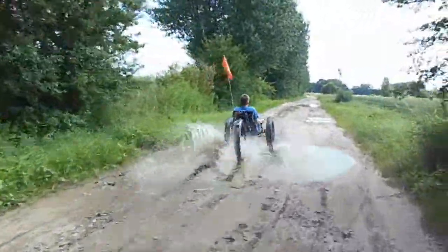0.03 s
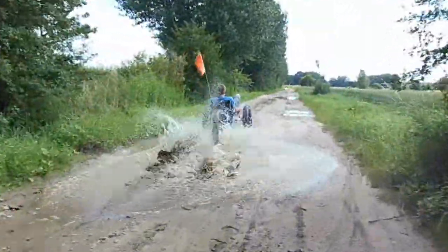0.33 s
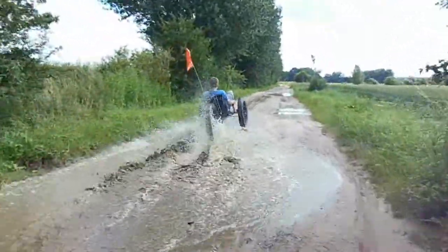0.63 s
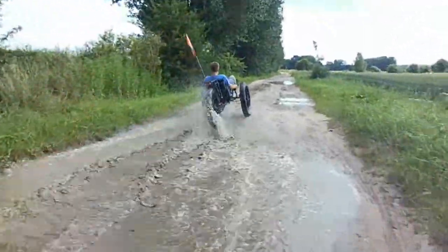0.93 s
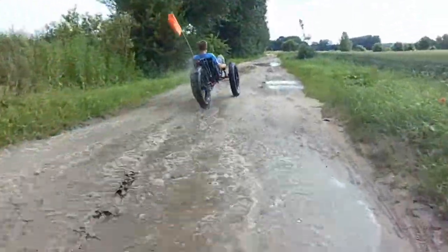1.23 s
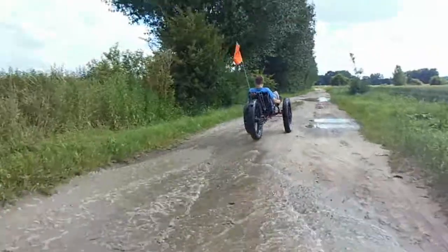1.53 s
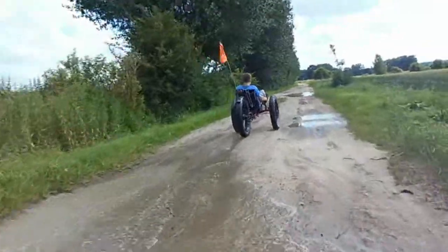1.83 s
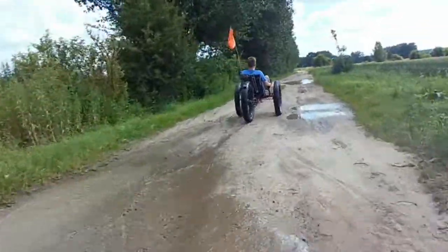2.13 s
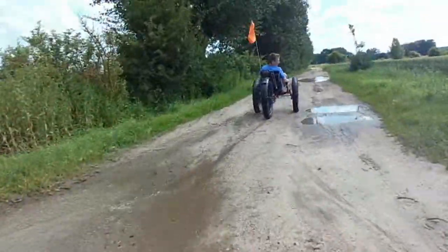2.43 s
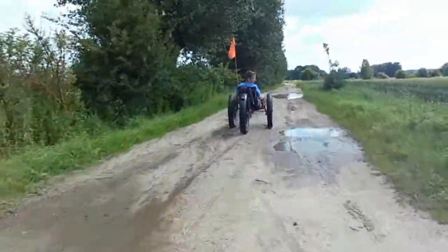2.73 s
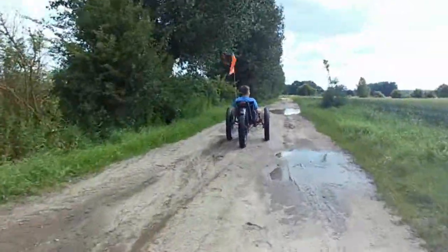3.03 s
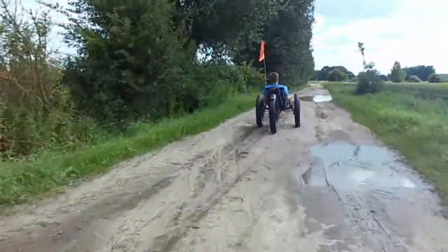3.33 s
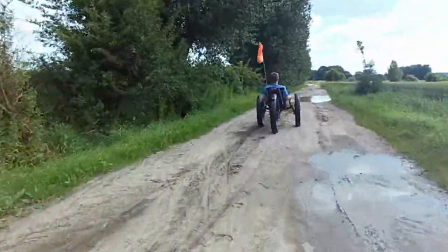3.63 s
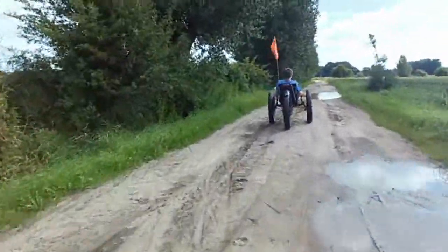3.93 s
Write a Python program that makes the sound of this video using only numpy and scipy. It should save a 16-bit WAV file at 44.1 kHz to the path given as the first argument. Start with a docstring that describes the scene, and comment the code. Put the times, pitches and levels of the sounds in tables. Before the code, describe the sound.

Water sprays from a trike's tyres in a muddy puddle for the first second, a hiss over low drumming and a faint rolling whirr. A sharp knock comes at about 1.1 seconds. From 1.4 seconds closer tyres throw a grainier spray with spatters of drops, running dry near 3 seconds. Wind buffets the microphone throughout, growing harder and overloading into a crackle from 3 to 4 seconds.

```python
"""A trike ploughs through a muddy puddle on a dirt track: its tyres throw a hissing spray over a low
drumming and a rolling whirr, while gusts buffet the microphone of a rider who follows. Just after one
second comes a sharp knock. Then the follower's tyres spray the track close by, flinging handfuls of
drops, and run dry at about three seconds. The gusts, faster and harder towards the end, overload the
microphone into a crackle."""
import sys
import numpy as np
from scipy import signal
from scipy.fft import rfft, irfft, next_fast_len
from scipy.io import wavfile
from scipy.ndimage import uniform_filter1d, map_coordinates

SR = 44100
rng = np.random.default_rng(int(sys.argv[2]) if len(sys.argv) > 2 else 0)


def master_out(mix):
    """Clip the mix to full scale and print it as 16-bit PCM to the path in sys.argv[1]."""
    frames = np.transpose(np.atleast_2d(mix))
    ceiling = np.clip(frames, -1, 1)
    pcm = np.round(ceiling * 32767).astype(np.int16)
    wavfile.write(sys.argv[1], SR, pcm)


N = 176400

# Fader for the water the trike throws: time_s, level_db
TRIKE_SPRAY_LEVEL = [(0.0, -58), (0.238, -57), (0.488, -55), (0.618, -54.5), (0.802, -59), (0.952, -62),
                     (1.108, -64), (1.3, -77)]
# EQ of that spray: frequency_hz, gain_db
TRIKE_SPRAY_EQ = [(200, -7), (750, 0), (1000, -3), (1250, -2.5), (1600, -1), (3300, -0.5), (4300, 1.5),
                  (5600, 0), (9000, 3), (12500, 0.5), (15500, -5.5)]
# Fader for the drumming of wheels in deep water: time_s, level_db
DRUMMING_LEVEL = [(0, -64), (.07, -51), (.17, -59), (.24, -55.5), (.42, -58.5), (.52, -71.5), (.7, -70),
                  (.77, -56.5), (.88, -72), (1.2, -82), (1.5, -86)]
# EQ of the drumming: frequency_hz, gain_db
DRUMMING_EQ = [(60, -35), (130, -10), (185, 1.5), (260, -3.5), (400, -14), (800, -39)]
# EQ of the tyres' dull rush on dirt: frequency_hz, gain_db
RUSH_EQ = [(25, 1), (110, 16), (300, 14), (750, -4), (1600, -7), (3500, 3), (7000, -1.5), (12000, -6),
           (15500, -16)]
# Fader for the tyres' hollow whirr: time_s, level_db
WHIRR_LEVEL = [(0, -69.5), (.6, -73), (.95, -75), (1.25, -77), (1.8, -71.5), (3, -78), (4, -78)]
# EQ of the whirr, one narrow peak: frequency_hz, gain_db
WHIRR_EQ = [(600, -38), (1000, -6), (1250, 5.5), (1500, -18.5), (2200, -25)]
# EQ of the ticking grit: frequency_hz, gain_db
GRIT_EQ = [(2500, -35), (5000, -7.5), (9000, -6), (12500, -10), (15500, -8)]
# Gusts at the microphone: time_s, strength_db
WIND_STRENGTH = [(0.0, -57.5), (0.03, -48.5), (0.08, -43), (0.17, -52), (0.22, -40.5), (0.269, -50.1),
                 (0.319, -42.5), (0.349, -51), (0.369, -46.5), (0.429, -48), (0.529, -65.5), (0.649, -54.5),
                 (0.698, -61.0), (0.768, -41), (0.788, -44), (0.808, -54), (0.928, -69), (0.988, -57),
                 (1.018, -61.5), (1.12, -62), (1.157, -73), (1.35, -67), (1.367, -54.5), (1.417, -54.5),
                 (1.487, -44.5), (1.527, -53.5), (1.586, -58), (1.636, -48.5), (1.696, -54), (1.726, -49.5),
                 (1.816, -62.5), (1.856, -47.5), (1.916, -47.5), (1.966, -50.5), (2.035, -44.5),
                 (2.135, -54.5), (2.155, -46.5), (2.205, -48), (2.235, -61), (2.275, -53.5), (2.395, -52.5),
                 (2.444, -47.5), (2.474, -54.5), (2.524, -52.5), (2.604, -58.5), (2.654, -47.0),
                 (2.744, -52.5), (2.764, -45), (2.794, -45.5), (2.834, -55.5), (2.873, -44), (2.893, -44.5),
                 (2.97, -55), (2.985, -53), (3.0, -70), (3.03, -68), (3.04, -54), (3.065, -64),
                 (3.083, -63), (3.093, -44.5), (3.133, -47.0), (3.263, -48), (3.283, -42.5), (3.322, -42),
                 (3.392, -44.5), (3.472, -40), (3.552, -42.5), (3.622, -49), (3.672, -46), (3.751, -41.5),
                 (3.811, -47), (3.881, -41), (3.931, -46.5), (3.971, -40.5), (3.991, -42)]
# How fast eddies pass at the reference strength: time_s, rate_hz
EDDY_RATE = [(0, 329.2), (.4, 372.1), (.8, 469.2), (1.3, 561.6), (2.0, 702.9), (2.7, 720.8), (3.1, 730.2),
             (3.4, 847.8), (3.75, 880.3), (4, 823.6)]
# EQ of the turbulence, sliding with that rate: multiple_of_eddy_rate, gain_db
EDDY_EQ = [(.03, -3.5), (.15, 0.5), (.45, 0.5), (1, -3), (1.6, -9), (2.6, -22), (5, -39), (12, -82),
           (20, -100)]
# EQ of the wind's rumble: frequency_hz, gain_db
RUMBLE_EQ = [(15, -32), (30, -8), (60, -3.5), (130, -2.5), (220, -16.5), (400, -12), (1500, -37),
             (5000, -100)]
# Single strong eddies, ahead of the overload: time_s, level_db, pitch_hz
EDDY_SLAPS = [(0.074, -41, 203), (0.2048, -43, 604), (0.2188, -37, 228), (0.2405, -35, 760),
              (0.3068, -44, 420.0), (0.3173, -37, 437), (0.762, -42, 694), (0.7749, -44, 408),
              (2.154, -34.5, 1029), (2.622, -43, 1200), (2.7041, -41, 599.3), (2.7908, -43, 755),
              (2.8801, -33.5, 950), (2.8987, -35, 1052), (2.9193, -41, 606), (2.9416, -37.5, 1052),
              (3.096, -37.5, 374), (3.158, -36, 915), (3.2124, -38, 2380), (3.219, -34.0, 1440),
              (3.3107, -30.5, 1370.0), (3.3383, -36, 1230.0), (3.3701, -34, 659), (3.3984, -36, 1070.0),
              (3.4247, -33.5, 1040), (3.4536, -34.0, 1100), (3.4694, -31.0, 1280.0), (3.4869, -32, 1080.0),
              (3.5053, -33.0, 1010), (3.5205, -33.0, 1160), (3.553, -35.5, 830), (3.5745, -32, 1219),
              (3.6048, -33, 1300), (3.6416, -32.5, 1010), (3.6949, -33.5, 870), (3.7143, -44, 940.0),
              (3.7513, -26.5, 1330), (3.7616, -28, 1600), (3.7724, -34.5, 1340), (3.782, -26.5, 1200),
              (3.8311, -31.5, 1000), (3.8794, -32, 527), (3.897, -31, 780.0), (3.9198, -32.0, 1310),
              (3.9754, -31.5, 1480)]
# The knock and its rebound: start_s, level_db
KNOCK_HITS = [(1.1181, -43.5), (1.1202, -49.5)]
# EQ of the knock's noise burst: frequency_hz, gain_db
KNOCK_EQ = [(200, -11), (800, -14), (1350, -8), (2600, -18), (3700, 0.5), (4700, 2), (6200, -5.5),
            (10000, -0.5), (15500, -2)]
# Partials the knock rings with: pitch_hz, relative_level_db, t60_s
KNOCK_PARTIALS = [(1466, -12.5, 0.074), (2260, -8.5, 0.035), (4250, -7, .03), (4570, -12, .03),
                  (4960, 2.5, .03)]
# Fader for the water the follower's tyres throw: time_s, level_db
NEAR_SPRAY_LEVEL = [(1.25, -68.5), (1.38, -60.5), (1.48, -55), (1.68, -53), (1.8, -50.5), (2.05, -50.5),
                    (2.22, -51.5), (2.42, -53), (2.6, -62.5), (2.66, -60.5), (2.74, -65.5), (2.81, -63),
                    (2.97, -73), (3.1, -74)]
# EQ of that close spray: frequency_hz, gain_db
NEAR_SPRAY_EQ = [(200, -56), (800, 3.5), (1250, 1), (1900, 0.5), (3000, 3.5), (4800, 5.5), (6800, 4.5),
                 (9500, 6.5), (12500, 6), (15500, -3.5)]
# Thicker flings of drops: time_s, level_db
SPATTER_CUES = [(1.53, -55), (1.79, -51), (2.065, -50), (2.22, -57), (2.37, -56), (2.665, -61), (2.80, -63)]

RUSH_DB, GRIT_DB = -70, -78.5
WIND_REFERENCE_DB, WIND_TRIM_DB, EDDY_RATE_EXPONENT = -50, -2.63, .44
FLUTTER_DB, FLUTTER_HZ, LULL_DB, LULL_HZ = 5.2, 280, 2, 110
RUMBLE_DB, RUMBLE_DB_PER_WIND_DB = -69, 0.91
KNOCK_T60_S, KNOCK_TAIL_DB, KNOCK_TAIL_T60_S, KNOCK_RING_DB = .028, -17.5, 0.12, -3
OVERLOAD_DB, NOTCH_HZ, NOTCH_WIDTH_HZ, HIGH_CUT_HZ = -36, 10880, 980, 15800


def amp(db):
    """Decibels to gain."""
    return 10 ** (np.asarray(db) / 20)


def unit(x):
    """Normalise to rms 1."""
    return x / np.sqrt(np.mean(x ** 2) + 1e-20)


def curve(rows):
    """An automation line through rows of time_s, value."""
    return np.interp(np.arange(N) / SR, *np.transpose(rows))


def wobble(rate_hz):
    """Smooth random modulation through rate_hz points a second."""
    return map_coordinates(rng.standard_normal(8192), [np.arange(N) * rate_hz / SR], mode="wrap")


def filtered(x, response):
    """Filter x by a gain given as a function of frequency."""
    size = next_fast_len(len(x) + SR // 2)
    return irfft(rfft(x, size) * response(np.fft.rfftfreq(size, 1 / SR)), size)[:len(x)]


def equalised(x, eq, frequency_scale=1):
    """Put x through an EQ curve and normalise it."""
    points, db = np.transpose(eq)
    return unit(filtered(x, lambda hz: amp(np.interp(np.log(hz + 1), np.log(points * frequency_scale), db))))


def noise(eq):
    """A steady bed of coloured noise at rms 1."""
    return equalised(rng.standard_normal(N), eq)


def decay(start_s, t60_s):
    """An envelope with an instant attack and an exponential tail."""
    age = np.arange(N) / SR - start_s
    return (age >= 0) * amp(-60 * np.abs(age) / t60_s)


def pings(spread_db, decay_cycles, count):
    """Tiny damped rings of random pitch and size: drops landing, bubbles bursting or grit ticking."""
    when, pitch, size = rng.random((count, 3)).T
    hz = 1200 * (15000 / 1200) ** (pitch ** .6)
    offsets = np.arange(256)
    cycles = hz[:, None] * offsets / SR
    strength = np.sqrt(hz) * amp(spread_db * np.minimum(-np.log(1 - size), 5))
    rings = strength[:, None] * np.sin(2 * np.pi * cycles) * np.exp(-cycles / decay_cycles)
    positions = (when * N).astype(int)[:, None] + offsets
    return unit(np.bincount(positions.ravel(), rings.ravel(), N)[:N])


def spray(eq, drops_db, spread_db, surge_db):
    """Mist and droplets, surging a little with the tread."""
    mist = rng.standard_normal(N)
    drops = amp(drops_db) * pings(spread_db, decay_cycles=1.8, count=9000)
    spectra = signal.stft(mist + drops, nperseg=256)[2]
    # Random patches of about 1 dB, across pitch and time, roughen the hiss.
    patches = uniform_filter1d(rng.standard_normal(spectra.shape), size=5, axis=0)
    patches_db = unit(uniform_filter1d(patches, size=6, axis=1))
    water = signal.istft(spectra * amp(patches_db), nperseg=256)[1][:N]
    return equalised(water, eq) * amp(surge_db * wobble(rate_hz=90))


def trike_spray(trim_db=2.5):
    """The trike's tyres throw water up ahead: a hiss that swells and dies away."""
    fade_out_db = 60 * np.maximum(np.arange(N) / SR - TRIKE_SPRAY_LEVEL[-1][0], 0)
    fader = amp(curve(TRIKE_SPRAY_LEVEL) - fade_out_db + trim_db)
    return fader * spray(TRIKE_SPRAY_EQ, drops_db=-7.5, spread_db=1, surge_db=.45)


def drumming():
    """A low flutter, probably water drumming against the frame."""
    return amp(curve(DRUMMING_LEVEL)) * noise(DRUMMING_EQ)


def rolling_tyres():
    """Tyres on damp dirt: a dull rush, a hollow whirr and fine ticks of grit."""
    rush = amp(RUSH_DB + 2.4 * wobble(rate_hz=29.25)) * noise(RUSH_EQ)
    whirr = amp(curve(WHIRR_LEVEL)) * noise(WHIRR_EQ)
    grit = amp(GRIT_DB) * equalised(pings(spread_db=2.5, decay_cycles=2.8, count=300), GRIT_EQ)
    return rush + whirr + grit


def wind():
    """Eddies sweep over the microphone: each surge is both louder and faster, over a low rumble."""
    strength_db = curve(WIND_STRENGTH) - WIND_REFERENCE_DB
    flutter_db = FLUTTER_DB * 2 * np.tanh(wobble(FLUTTER_HZ) / 2)
    lull_db = LULL_DB * np.tanh(wobble(LULL_HZ))
    flow = amp(strength_db) * unit(amp(flutter_db + lull_db))
    # Varispeed: stronger flow runs through the turbulence faster, so it brightens.
    eddies_passed = np.cumsum(curve(EDDY_RATE) * flow ** EDDY_RATE_EXPONENT) / SR
    samples_per_eddy = 32
    turbulence = equalised(rng.standard_normal(N), EDDY_EQ, frequency_scale=SR / samples_per_eddy)
    buffet = flow * map_coordinates(turbulence, [eddies_passed * samples_per_eddy], mode="wrap")
    rumble = amp(RUMBLE_DB + RUMBLE_DB_PER_WIND_DB * strength_db) * noise(RUMBLE_EQ)
    return amp(WIND_REFERENCE_DB + WIND_TRIM_DB) * buffet + rumble


def wind_slaps(half_width_cycles=.85):
    """A single strong eddy gives one quick suck of pressure with a push on either side."""
    t, pressure = np.arange(N) / SR, np.zeros(N)
    for time_s, db, hz in EDDY_SLAPS:
        span = np.abs(t - time_s) < 2 / hz
        cycles = (t[span] - time_s) * hz
        envelope = amp(db) * np.exp(-(cycles / half_width_cycles) ** 2)
        pressure[span] -= envelope * np.cos(2 * np.pi * cycles + rng.uniform(-1.3, 1))
    return pressure


def knock():
    """A hard double tick, probably a part of the bike: a short ring and a rattling tail."""
    envelope = np.zeros(N)
    for start_s, db in KNOCK_HITS:
        tail = amp(KNOCK_TAIL_DB) * decay(start_s, KNOCK_TAIL_T60_S)
        envelope += amp(db) * (decay(start_s, KNOCK_T60_S) + tail)
    first_s, first_db = KNOCK_HITS[0]
    age = np.arange(N) / SR - first_s
    ring = sum(amp(first_db + db) * decay(first_s, t60_s) * np.sin(2 * np.pi * hz * age)
               for hz, db, t60_s in KNOCK_PARTIALS)
    return envelope * noise(KNOCK_EQ) + amp(KNOCK_RING_DB) * ring


def near_spray(trim_db=2.07):
    """The follower's tyres throw a closer, grainier spray that fades as they run dry."""
    t = np.arange(N) / SR
    fade_in_db = 120 * np.maximum(NEAR_SPRAY_LEVEL[0][0] - t, 0)
    fade_out_db = 25 * np.maximum(t - NEAR_SPRAY_LEVEL[-1][0], 0)
    fader = amp(curve(NEAR_SPRAY_LEVEL) - fade_in_db - fade_out_db + trim_db)
    return fader * spray(NEAR_SPRAY_EQ, drops_db=-4, spread_db=3.5, surge_db=.9)


def spatters(half_width_s=0.019):
    """Now and then a tyre flings a thicker handful of drops."""
    t = np.arange(N) / SR
    swells = sum(amp(db) * np.exp(-((t - time_s) / half_width_s) ** 2) for time_s, db in SPATTER_CUES)
    return swells * equalised(pings(spread_db=4, decay_cycles=2, count=6000), NEAR_SPRAY_EQ)


def scene():
    """Water, wheels and wind in one mono mix."""
    water = trike_spray() + near_spray() + spatters() + drumming()
    return (water + rolling_tyres() + knock() + wind() + wind_slaps())[None]


def record(dry):
    """The microphone overloads hard on the strongest peaks, then adds a treble notch and a high cut."""
    def response(hz):
        notch = np.abs(hz - NOTCH_HZ) / np.hypot(hz - NOTCH_HZ, NOTCH_WIDTH_HZ / 2)
        return notch * (hz < HIGH_CUT_HZ)

    overloaded = np.clip(dry[0], -amp(OVERLOAD_DB), amp(OVERLOAD_DB))
    return filtered(overloaded, response)[None]


dry = scene()
out = record(dry)
master_out(out)
```